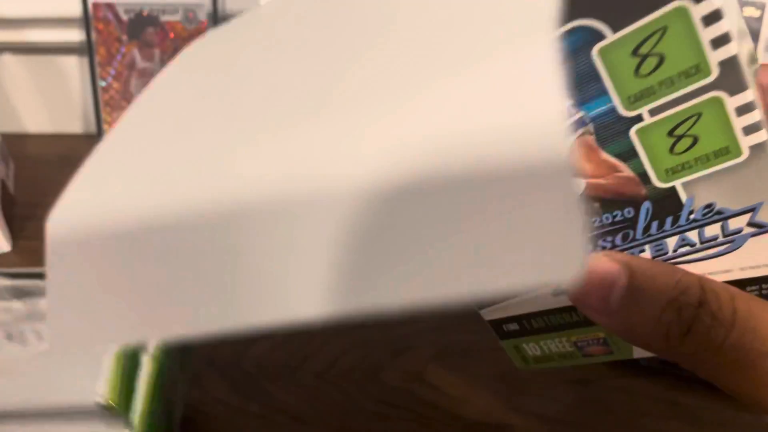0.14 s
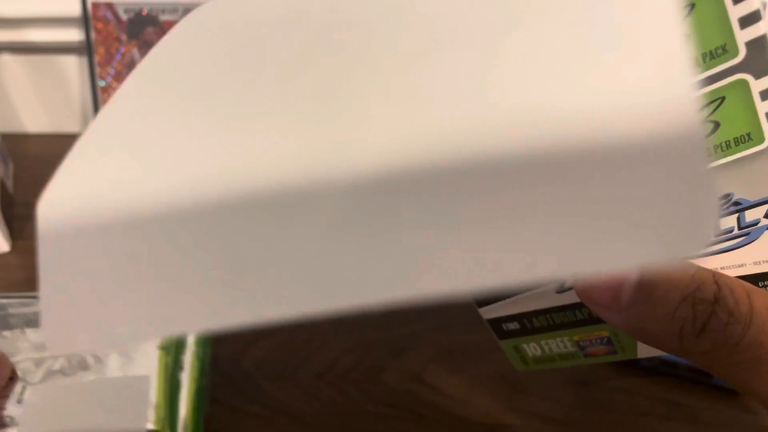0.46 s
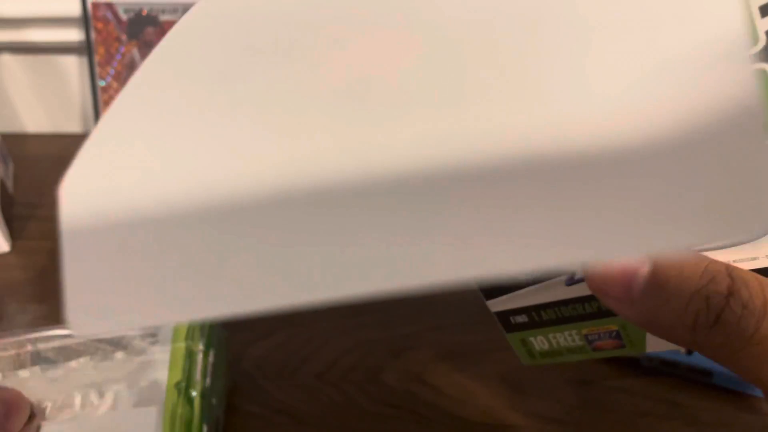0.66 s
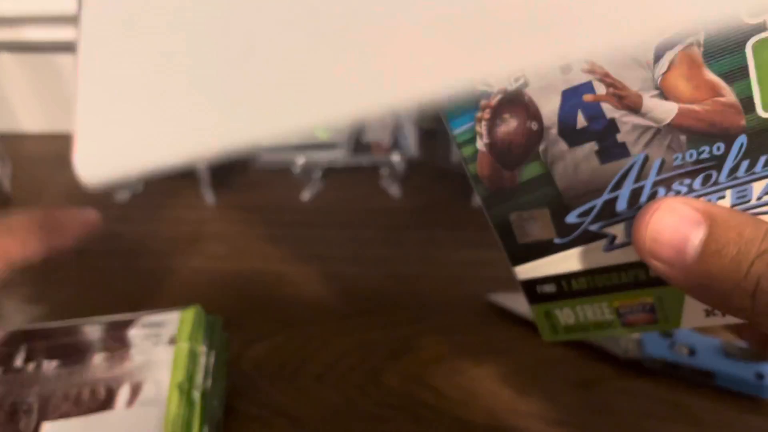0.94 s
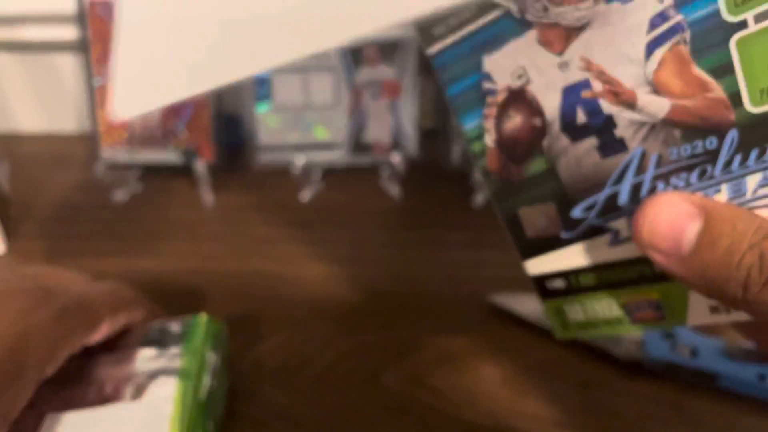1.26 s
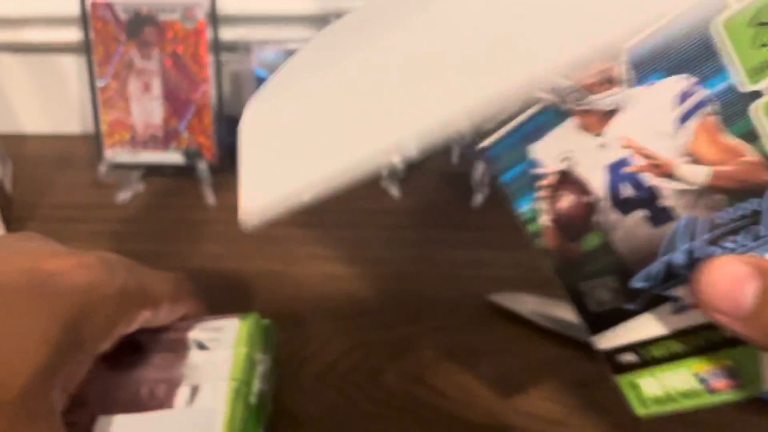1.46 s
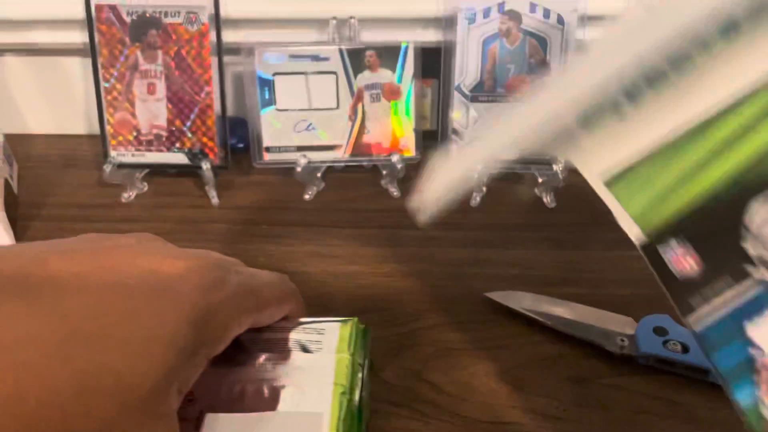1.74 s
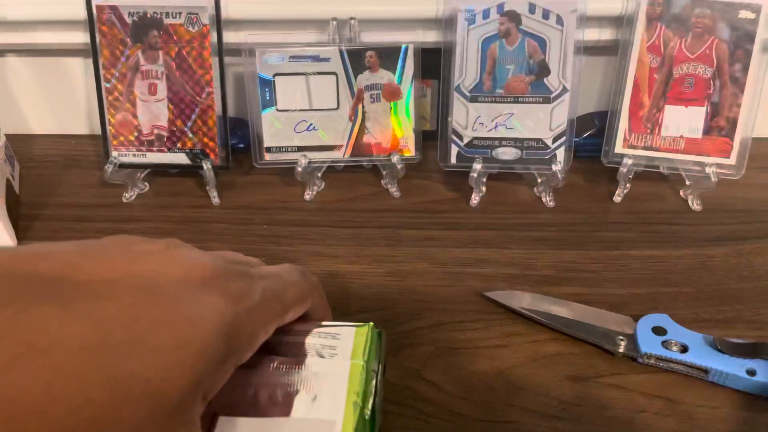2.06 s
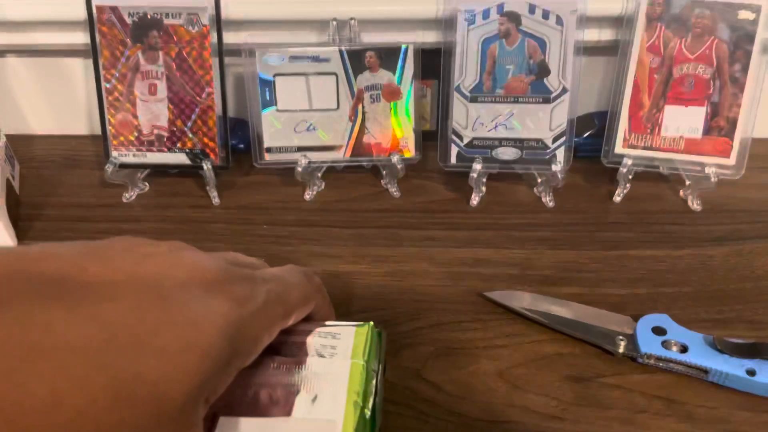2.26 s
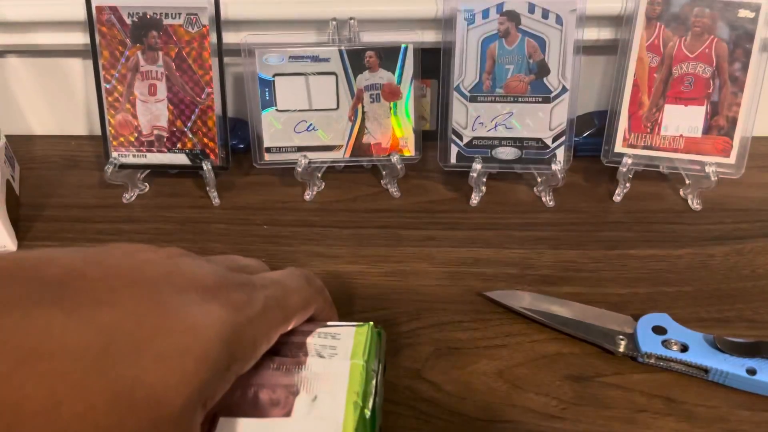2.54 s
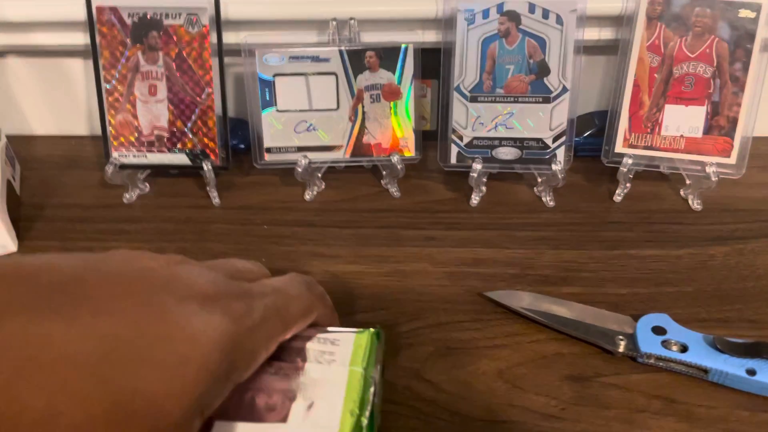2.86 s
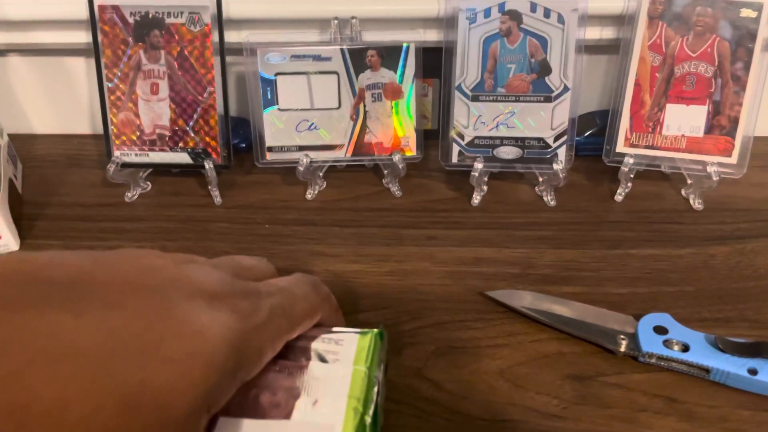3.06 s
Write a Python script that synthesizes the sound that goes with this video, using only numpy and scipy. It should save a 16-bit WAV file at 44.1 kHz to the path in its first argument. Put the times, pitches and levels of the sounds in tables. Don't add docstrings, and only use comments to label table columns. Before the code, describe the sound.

Cardboard box handling: crisp foil crackles, a quiet lull, then hollow knocks, scrapes and corner ticks

```python
import sys
import numpy as np
from scipy import signal
from scipy.fft import rfft, irfft, next_fast_len
from scipy.io import wavfile
from scipy.ndimage import uniform_filter1d

SR = 44100
rng = np.random.default_rng(int(sys.argv[2]) if len(sys.argv) > 2 else 0)


def store_pcm(level_fs):
    pcm = np.round(np.clip(level_fs, -1, 1) * 32767).astype(np.int16)
    wavfile.write(sys.argv[1], SR, np.atleast_2d(pcm).T)


def ratio(d):
    e = np.asarray(d, float) / 20
    return 10 ** e


N = 141120
T = np.arange(N) / SR
SIZE = next_fast_len(N + SR)
HZ = np.maximum(np.arange(SIZE // 2 + 1) * SR / SIZE, 1)

# pitch in Hz, width of the resonance in Hz, level in dB.
BOX_WALLS = [(835, 360, 0.5), (1809, 560, -5.5), (2507, 600, -9), (3670, 210, -19.5), (4360, 193, -18),
             (5370, 300, -18)]
# frequency in Hz, level in dB.
CARD_TONE = [(200, -6), (1000, 4), (3000, 0), (5500, -2.5), (8500, 5), (13000, -3), (16000, -15.5)]
# frequency in Hz, level in dB.
SPARKLE_TONE = [(6000, -6.5), (9000, 4.5), (12800, -1), (14500, -2), (16000, -37.5)]


def table(points):
    p = np.array(points, float)
    return np.interp(np.log(HZ), np.log(p[:, 0]), p[:, 1])


def shape(x, gain):
    return irfft(rfft(x, SIZE) * gain, SIZE)[..., :N]


def unit(x):
    return x / np.sqrt(np.mean(x ** 2))


def band(lo_hz, hi_hz):
    s = 1j * HZ
    return (s / (s + lo_hz) * hi_hz / (s + hi_hz)) ** 2


def walk(rate):
    k = int(SR / rate)
    stairs = np.repeat(rng.standard_normal(N // k + 1), k)
    return 1.3 * uniform_filter1d(uniform_filter1d(stairs, k), k)[:N]


def curve(rows, column=1):
    r = np.array(rows, float)
    return np.interp(T, r[:, 0], r[:, column])


def add(out, start_s, x):
    i = int(start_s * SR)
    out[i:i + len(x)] += x[:N - i]


def grit(per_s, share):
    clicks = (rng.random(N) < per_s / SR) * rng.standard_normal(N)
    return rng.standard_normal(N) + share * unit(clicks)


def snaps(rows):
    # frequency in Hz, level in dB.
    snap_tone = [(300, -5), (800, 0), (7000, 2), (13000, -3.5), (16000, -18)]
    t = T[:2600]
    fade = np.exp(-t / 0.0023) + ratio(-11) * np.exp(-t / 0.0053)
    env = fade * np.minimum(t / 0.00084, 1)
    body, treble, sparkle = np.zeros((3, N))
    for s, db, body_db, sparkle_db in rows:
        x = env * rng.standard_normal(len(t))
        x = x / np.abs(x).max() * ratio(db + 7.0)
        add(treble, s, x)
        add(body, s, x * ratio(body_db + 17.5))
        add(sparkle, s, x * ratio(sparkle_db + 5))
    mix = shape(body, band(400, 1720)) + shape(treble, band(3100, 4080)) + shape(sparkle, band(12450, 10000))
    return shape(mix, ratio(table(snap_tone)))


def foil_crackles():
    # start in seconds, peak in dB, body and then sparkle in dB against the treble.
    creases = [(0.0291, -42.5, -4.5, -30), (.1426, -37.5, -26, -14), (.1625, -44, -9, -18),
               (0.1873, -32, -7, -15), (0.2139, -23.5, -17.5, -0.5), (0.2251, -19, -20, -3),
               (0.2478, -19, -24, 3), (0.2774, -24.5, -44, -1), (.2975, -35, -38, -25),
               (0.3011, -22.5, -48, 6.5), (.3646, -34, -19, -17), (0.4289, -16, -64, -2.5),
               (0.4504, -26.5, -14, -36), (0.4621, -26.5, -17.5, -13), (0.4730, -25, -21, 0.5),
               (0.5210, -21, -22, -11), (0.5425, -18, -18.5, -2.5), (0.62, -36, -36, 0),
               (0.637, -23.5, -22, -5), (0.6504, -10.5, -21.5, 2), (0.7297, -27.5, -31.5, 1),
               (1.115, -37, -22, -1), (1.129, -20.5, -24, 3.5), (1.1398, -32, -50, 6),
               (1.1479, -18, -22, 1), (1.1779, -39, -5, -7), (1.2376, -40, -13, 7.5),
               (1.2595, -40, -22, -5), (1.273, -32, -42, -1), (1.3034, -25, -19, -3.5),
               (1.3298, -32, -14.5, -11), (1.4176, -37, -4.5, -21)]
    return snaps(creases)


def lid_flaps():
    # start in seconds, peak in dB, last pitch in Hz.
    bends = [(0.215, -42, 59), (0.544, -44, 58.7), (.65, -48, 57), (1.184, -30, 58.8), (1.421, -31.5, 171),
             (1.471, -40, 61.2), (1.48, -43, 320), (1.541, -43, 60.6), (1.605, -44, 171),
             (1.70, -47.5, 172), (2.215, -32, 133), (2.252, -30, 147.6), (2.336, -26.5, 147.8),
             (2.371, -29.5, 172), (2.467, -43, 154), (2.799, -41.5, 91), (2.822, -30, 83.5),
             (2.835, -38, 59.3), (2.885, -42.5, 96.7), (2.983, -40.5, 154), (3.019, -43.5, 121.6)]
    start_hz, fall_s, cycles, lid_stops_s = 560, .004, 23, 1.44
    t, out = T[:20000], np.zeros(N)
    for s, db, hz in bends:
        extra_hz = start_hz * (1 if s < lid_stops_s else .25)
        turns = hz * t + extra_hz * fall_s * t / (t + fall_s)
        x = np.sin(2 * np.pi * turns)
        x = x + ratio(-4) * np.sin(2 * np.pi * 1.83 * turns + 1) * np.exp(-t / 0.022)
        fade = np.exp(-np.log(1000) * t * hz / cycles)
        add(out, s, ratio(db) * x * fade * (1 - np.exp(-t / 0.0009)))
    return out


def finger_slide():
    # start in seconds, level in dB, smoothness as dB of sparkle.
    strokes = [(0, -63.5, -9), (.17, -69.5, 9.5), (.24, -70, -31), (.4, -58.5, 0), (.5, -53.5, 1.5),
               (.74, -62, -26), (.9, -106, -12), (1.11, -87.5, -1.5), (1.14, -48.5, -8), (1.22, -77, 14),
               (1.42, -65, 14), (1.7, -69.5, 12), (1.87, -77, 4), (1.95, -98, 1)]
    level_db, smooth_db = curve(strokes), curve(strokes, column=2)
    card = unit(shape(grit(500, 1.0), ratio(table(CARD_TONE))))
    card = card * ratio(level_db + 0.4 * walk(27.1))
    sparkle = unit(shape(grit(640, 0.07), ratio(table(SPARKLE_TONE))))
    sparkle = sparkle * ratio(level_db + smooth_db + 0.88 * walk(28.8))
    return (card + sparkle) * (T < strokes[-1][0])


def box_knocks():
    # start in seconds, peak in dB, pitch of the air inside in Hz, ring time in seconds.
    blows = [(1.805, -32, 754, 0.0047), (1.8965, -42.5, 863, 0.0049), (2.064, -42, 1630, 0.0086),
             (2.075, -35.5, 608, .004), (2.109, -39, 390.5, 0.014), (2.198, -24.5, 680, 0.0063),
             (2.202, -20.5, 618, 0.0033), (2.238, -30, 1960, 0.008), (2.242, -26.5, 452, 0.0032),
             (2.277, -27, 729, 0.0069), (2.332, -19, 834, 0.01), (2.352, -22, 890, 0.0078),
             (2.366, -17.5, 843, 0.0066), (2.388, -13.5, 837, 0.0041), (2.393, -18, 865, 0.0077),
             (2.401, -36, 656, .005), (2.47, -26, 433, 0.0018), (2.63, -43, 660, 0.0084),
             (2.847, -23.5, 589, 0.0046), (2.858, -31, 831, 0.011), (2.865, -28, 870, 0.0033)]
    t, out = T[:5000], np.zeros(N)
    walls = np.array(BOX_WALLS, float)
    for s, db, hz, ring_s in blows:
        pitch, loudness, phase = rng.standard_normal((3, len(walls) + 2))
        f = np.r_[hz, hz * 1.2, walls[:, 0]] * (1 + 0.032 * pitch)
        g = ratio(np.r_[0, -5, walls[:, 2] - 4] + 1.7 * loudness)
        tau = ring_s * (800 / f) ** 0.96
        notes = np.exp(-t / tau[:, None]) * np.sin(2 * np.pi * f[:, None] * t + phase[:, None])
        x = (g[:, None] * notes).sum(axis=0)
        x = x * (1 - np.exp(-(t / 0.00093) ** 2))
        add(out, s, x / np.abs(x).max() * ratio(db))
    return out


def corner_ticks():
    # start in seconds, peak in dB, body and then sparkle in dB against the treble.
    touches = [(2.0177, -40, -12, 1), (2.1055, -38.5, -13, -13), (2.205, -33, -22, 1),
               (2.2372, -36.5, -3.5, -11), (2.3076, -42, -30, -8), (2.333, -26, -22, -1),
               (2.351, -22, -5, -14), (2.367, -24, -17, -8), (2.3869, -28.5, -3.5, -17),
               (2.4687, -33.5, 0.5, -3), (2.631, -48, -34, -5), (2.6717, -46, -36, -21),
               (2.6962, -38.5, -11, -12), (2.7306, -19.5, -51, -23), (2.8453, -16, -12, -16),
               (3.004, -52.5, 1, -3), (3.0289, -35.5, -12, -17), (3.1147, -53, -21, 6),
               (3.1526, -40, -26, 1)]
    return snaps(touches)


def even(gain):
    return gain / np.sqrt(np.mean(np.abs(gain) ** 2))


def box_drag():
    # start in seconds, length in seconds, level in dB, scratch pitch in Hz, sparkle in dB.
    scuffs = [(1.776, 0.037, -68, 1710, -15), (2.011, 0.069, -66.5, 5230, 5), (2.104, 0.024, -61, 3180, -7),
              (2.14, 0.096, -56, 3240, -7), (2.231, 0.037, -55.5, 3710, -3), (2.3, 0.05, -44, 5920, -7),
              (2.348, 0.0075, -33, 5350, -1), (2.358, 0.011, -44, 4200, -13),
              (2.376, 0.011, -55, 2300, -25), (2.466, 0.011, -48, 2940, -41), (2.528, .1, -71, 2470, 6),
              (2.706, 0.029, -55.5, 3620, 3), (2.727, 0.0034, -46.5, 3370, -20),
              (2.746, 0.059, -55, 3380, -1), (2.851, .07, -68, 3200, -36), (2.8433, .003, -39, 4300, -32),
              (2.996, 0.17, -70, 3700, -5)]
    grains_per_s, grain_s, most = 450, .003, 80
    walls = sum(ratio(db) / (1 + 1j * (HZ - hz) / (2.3 * width)) for hz, width, db in BOX_WALLS)
    walls = walls + ratio(11.5) * band(350, 1800)
    rub = grit(400, .7) * ratio(4.5 * walk(90))
    scrape, pings, t = 0, np.zeros(N), T[:900]
    swell = t / grain_s * np.exp(1 - 2 * t / grain_s)
    for s, length, db, hz, sparkle_db in scuffs:
        on = np.clip((T - s) / (0.15 * length), 0, 1) * np.exp(-np.maximum(T - s - length, 0) / 0.013)
        edge = ratio(table(CARD_TONE)) / (1 + (HZ / hz / 2) ** 4) + ratio(table(SPARKLE_TONE) + sparkle_db)
        tone = ratio(-2.5) * even(edge) + ratio(-7 * np.log2(hz / 2600)) * even(walls)
        scrape = scrape + rfft(rub * on * ratio(db), SIZE) * tone
        when, (pitch, loudness) = rng.random(most), rng.standard_normal((2, most))
        for k in range(min(int(length * grains_per_s), most)):
            f = min(hz * np.exp(.25 * pitch[k]), SR / 3)
            add(pings, s + length * when[k], ratio(db + 4 * loudness[k]) * np.sin(2 * np.pi * f * t) * swell)
    return irfft(scrape, SIZE)[:N] + 2 * pings


def tink():
    # pitch in Hz, level in dB, time to fade by 60 dB in seconds.
    ring_notes = [(3150, 0, .6), (4450, 0, .35), (5900, -5, .4), (2050, -4, .4)]
    t, ring, out = T[:8000], 0, np.zeros(N)
    for hz, db, t60 in ring_notes:
        ring = ring + ratio(-63 + db) * np.sin(2 * np.pi * hz * t) * np.exp(-np.log(1000) * t / t60)
    add(out, 3.027, ring)
    return out


def sway():
    # time in seconds, level in dB.
    swings = [(0, -67.5), (1.15, -74.5), (1.38, -49.5), (1.5, -46), (1.65, -55.5), (1.95, -65), (2.22, -45),
              (2.4, -42), (2.6, -56.5), (2.85, -47.5), (3.2, -65.5)]
    # frequency in Hz, level in dB.
    rumble_tone = [(25, -7.5), (60, 6.5), (95, 6), (180, 2), (330, -4.5), (900, -31.5)]
    rumble = unit(shape(rng.standard_normal(N), ratio(table(rumble_tone))))
    return rumble * ratio(curve(swings) + 0.5 * walk(41))


def room_hush():
    # frequency in Hz, level in dB.
    hush_tone = [(25, -16), (60, -5), (300, -6.5), (600, -18.5), (2500, -31.5), (13000, -38),
                 (16000, -53.5)]
    return unit(shape(rng.standard_normal((2, N)), ratio(table(hush_tone)))) * ratio(-76)


def place(x, flat_db, pan_db, turn, hz, lag_s):
    bump = np.exp(-(np.log(HZ / hz) / 0.6) ** 2)
    level_db = flat_db / (1 + (HZ / 9000) ** 4) + pan_db * bump
    phase = .5 * turn * bump - np.pi * HZ * lag_s
    half = ratio(level_db / 2) * np.exp(1j * phase)
    return np.array([shape(x, half), shape(x, 1 / half)])


def spread(mid, side, share):
    middle = 0.36 + np.exp(-(np.log(HZ / 1550) / 1.72) ** 2)
    treble = .12 + 1 / (1 + (HZ / 5600) ** 8)
    side = shape(side, share * middle * treble)
    return np.array([mid + side, mid - side])


def room_tail(t60_s):
    fade = np.exp(-np.log(1000) * T / t60_s)
    return rng.standard_normal((2, N)) * fade * np.clip((T - .003) / 0.00071, 0, 1)


def room(x):
    low = 1 / (1 + (HZ / 3000) ** 2)
    r = unit(shape(room_tail(0.4), low) + shape(room_tail(0.39), 1 - low)) / np.sqrt(N)
    return ratio(-5) * shape(x, rfft(spread(r[0], r[1], 0.83), SIZE) * band(71, 8300))


def scene():
    left = foil_crackles() + tink()
    hits, rub, low, ticks = box_knocks(), box_drag(), lid_flaps(), corner_ticks()
    near = place(left, 7.3, 0.91, 1.28, 2300, -0.0000036)
    near = near + place(hits + rub, 0.23, -7.5, -1.93, 940, .00001)
    near = near + place(low, 2.5, 0.68, 0.34, 180, 0)
    near = near + place(ticks, 0.34, -9, -2.67, 930, .000028)
    loose = spread(finger_slide(), finger_slide(), 1.0) + spread(sway(), sway(), 0.53)
    loose = loose * ratio(np.array([[.2], [-.2]]))
    wet = room(left + rub + ticks + ratio(-4.5) * hits + low)
    hush = room_hush()
    return near + loose + wet + spread(hush[0], hush[1], 0.63)


def band_limit(x):
    return signal.sosfilt(signal.butter(12, 16580, fs=SR, output="sos"), x)


def record(dry):
    # frequency in Hz, phase between the ports in radians.
    port_phase = [(3500, 0), (5200, .5), (5900, -1.2), (6800, -1.), (7800, -3.), (9500, -3.3),
                  (12000, -5.6), (14000, -6.3)]
    half = np.exp(.5j * table(port_phase))
    x = np.array([shape(dry[0], half), shape(dry[1], 1 / half)])
    top_cut = signal.ellip(8, .2, 70, 15800, fs=SR, output="sos")
    return band_limit(signal.sosfilt(top_cut, x))


dry = scene()
out = record(dry)
store_pcm(out)
```